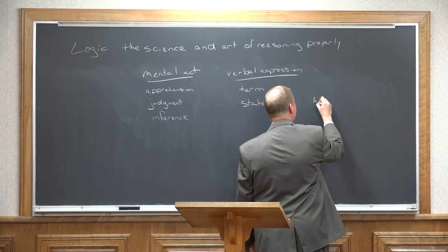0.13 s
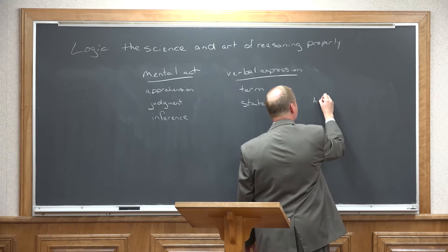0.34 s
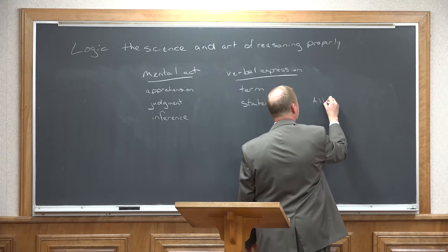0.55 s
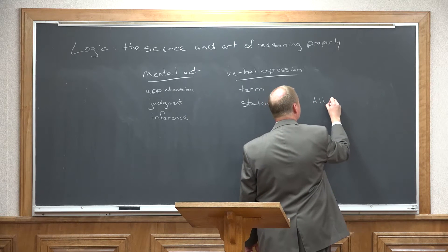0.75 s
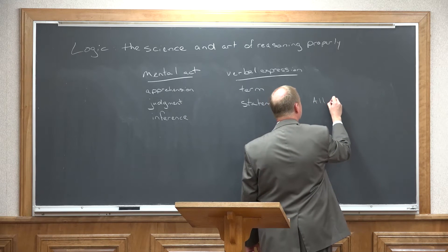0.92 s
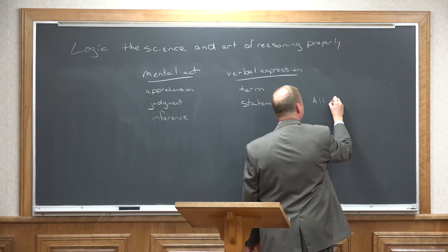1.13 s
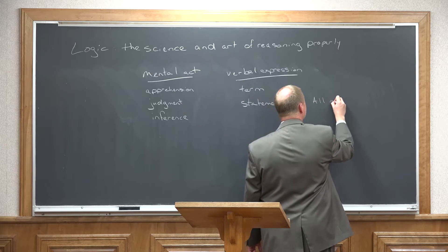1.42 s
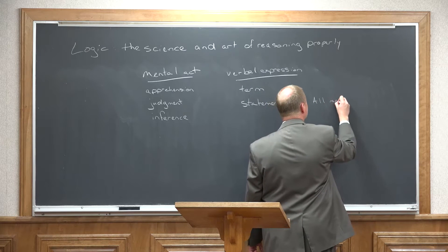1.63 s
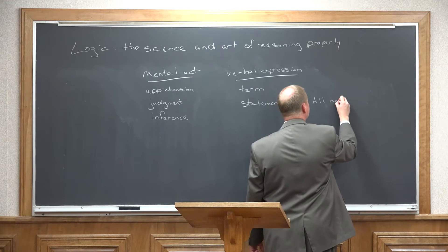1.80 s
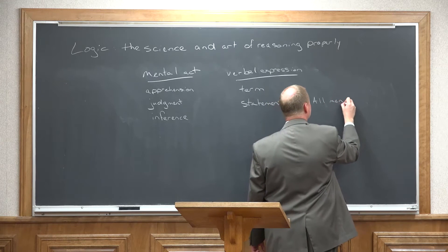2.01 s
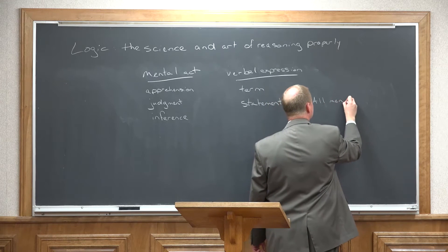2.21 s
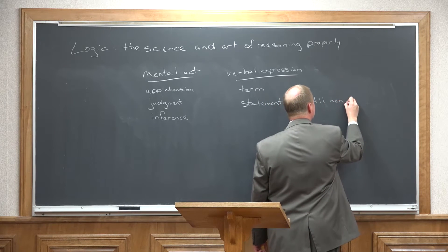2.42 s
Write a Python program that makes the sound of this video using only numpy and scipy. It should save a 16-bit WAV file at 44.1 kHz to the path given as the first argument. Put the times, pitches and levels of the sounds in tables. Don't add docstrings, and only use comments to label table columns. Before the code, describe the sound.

Close-up chalk strokes on a slate board in a hard-walled classroom; crisp and duller taps ring briefly, quiet dry drags fill between them, a soft knock comes midway, and steady room rumble and faint hiss continue underneath.

```python
import sys
import numpy as np
from scipy import signal
from scipy.fft import rfft, irfft
from scipy.io import wavfile
from scipy.ndimage import uniform_filter1d

SR = 44100
rng = np.random.default_rng(int(sys.argv[2]) if len(sys.argv) > 2 else 0)


def level_to_linear(level):
    exponent = np.asarray(level, float) / 20
    return 10 ** exponent


def store_pcm(level_fs):
    pcm = np.round(np.clip(level_fs, -1, 1) * 32767).astype(np.int16)
    wavfile.write(sys.argv[1], SR, np.atleast_2d(pcm).T)


N = 112454
LEAD = SR // 2

# (frequency [Hz], density [dB/Hz])
AIR_SPECTRUM = [(20, 5), (45, 5), (120, -9), (400, -18), (1500, -21), (3000, -27), (8000, -31.5),
                (16000, -35.5)]
AIR_DB, AIR_FLICKER_DB, AIR_FLICKER_HZ = -50, .7, 6.45

# (time [s], peak [dB], contact [ms], frame ring [dB], room [dB])
LANDINGS = [
    (-.2, -4, 0.095, 0, 4),
    (0.1071, -9, 0.095, -4, 2.5),
    (.3689, -5, 0.04, -6, 3),
    (0.7357, -9, 0.061, -3.5, 3),
    (1.3421, -7, 0.082, -4.5, 3),
    (1.6999, -7.5, 0.034, -3.5, 3),
    (2.1456, -6.5, 0.088, -7, 3.5),
]
# (frequency [Hz], level [dB], T60 [s])
BOARD_MODES = [(584, 3, 0.011), (1030, -.5, 0.0069), (1690, -8, .007), (3720, -0.5, 0.0054),
               (7600, -16, 0.0012)]
# (frequency [Hz], level [dB], T60 [s])
PANEL_MODES = [(67.2, -32, 0.74), (88, -27.5, 0.25), (122.2, -35.5, 0.36), (216.4, -30.5, 0.6),
               (306.2, -25.5, 0.21)]
# (frequency [Hz], level [dB], T60 [s])
FRAME_MODES = [(720, -22, 0.056), (1190, -21, 0.11), (1519, -11.5, 0.059), (1820, -10.5, 0.041),
               (2147, -23.5, 0.055), (3294, -6, 0.016), (4130, -10.5, 0.013)]
# (delay [s], level [dB])
NEAR_ECHOES = [(.0026, -13), (.0087, -20)]
# (frequency [Hz], level [dB], T60 [s])
NEAR_SCATTER = [(250, -40, 0.043), (595, -12.5, 0.07), (1200, -6.5, 0.072), (1900, -11, 0.096),
                (2800, -13, 0.057), (3960, -1, 0.028), (9300, -34, .05), (15000, -36, .04)]
# (frequency [Hz], level [dB], T60 [s])
TIP_CRUNCH = [(2500, -18, 0.047), (4000, -43, 0.023), (6440, -27.5, 0.032), (10000, -33.5, 0.035),
              (15000, -55, 0.036)]
# (frequency [Hz], level [dB], T60 [s])
ROOM_TAIL = [(41, -40.5, 1.6), (148, -31, 0.87), (540, -29.5, 0.88), (1390, -31, 0.96), (2430, -33, 0.54),
             (4860, -59, 1.9), (8000, -43, 0.67), (15000, -62, .4)]
# (frequency [Hz], level [dB], T60 [s])
ROOM_BLOOM = [(710, -54, 0.23), (1310, -32, 0.86), (1920, -37, 0.92), (2500, -40, 0.8), (3300, -33, 0.79),
              (5000, -37, 0.62), (8000, -43, 0.44), (14000, -60, .2)]
DETUNE, SCATTER_DB, LANDING_SCATTER = 0.0264, 1, .3
CONTACT_RISE_S, FRAME_RISE_S, FRAME_DELAY_S = .000022, .0008, 0.002538
PANEL_DELAY_S, THUMP_HZ, THUMP_DB, THUMP_T60_S = 0.00556, 179, -13.5, 0.01
NEAR_RISE_S, ROOM_RISE_S, ECHO_SMEAR_S = .004, .01, .0006
CRUNCH_RISE_S, CRUNCH_DB_PER_MS, CRUNCH_REF_MS = .001, -91, 0.117

# (start [s], end [s], start level [dB], end level [dB])
DRAGS = [(0.114, .24, -60, -65), (0.377, 0.498, -57, -59), (0.74, 1.16, -66, -68),
         (1.158, 1.247, -61, -60.5), (1.345, 1.418, -59, -59), (1.42, 1.592, -64, -56.5),
         (1.595, 1.697, -65, -67.5), (1.7, 1.874, -60, -62.5), (1.867, 2.003, -57.5, -60.5),
         (1.998, 2.16, -69.5, -62.5), (2.134, 2.405, -60, -59), (2.395, 2.48, -64, -66),
         (2.463, 2.606, -65.5, -51)]
# (frequency [Hz], density [dB/Hz])
GRIT_SPECTRUM = [(800, -6), (2800, -7), (3980, -2), (4130, 5), (4280, -2), (5800, -3.5), (8200, 0),
                 (15500, -8)]
# (frequency [Hz], density [dB/Hz])
RUMBLE_SPECTRUM = [(20, 5), (55, 9.5), (130, -1), (250, -13), (500, -34)]
RUMBLE_DB, GRIT_SPREAD_DB, GRIT_FLICKER_DB, GRIT_FLICKER_HZ = 10.5, 1.9, 1.4, 40
DRAG_RISE_S, DRAG_FALL_S, DRAG_ROOM_DB, DRAG_T60_S = .015, .008, -7, .3

# (time [s], peak [dB], contact [ms])
SOFT_KNOCKS = [
    (1.224, -26, 0.85),
    (1.575, -46, .3),
    (0.56, -37, 0.15),
]
# (time [s], peak [dB], pitch [Hz])
SNAPS = [
    (2.4495, -47, 11400),
    (1.891, -52, 6500),
    (1.102, -54, 7000),
]
SNAP_S = .003

BASS_CUT_HZ, TOP_HZ = 19, 15850


def table(rows, hz, order=1):
    rows = np.array(rows, float)
    return np.interp(np.log(np.maximum(hz, 1)), np.log(rows[:, 0]), rows[:, order])


def colour(x, rows):
    gain = level_to_linear(table(rows, np.fft.rfftfreq(len(x), 1 / SR)))
    y = irfft(rfft(x) * gain, len(x))
    return y / np.std(y)


def walk(rate_hz, size):
    hold = int(SR / rate_hz)
    w = np.repeat(rng.standard_normal(size // hold + 1), hold)
    w = uniform_filter1d(uniform_filter1d(w, hold), hold)[:size]
    return w / np.std(w)


def air():
    level = level_to_linear(AIR_DB + AIR_FLICKER_DB * walk(AIR_FLICKER_HZ, N))
    return level * colour(rng.standard_normal(N), AIR_SPECTRUM)


def rise(x, rise_s):
    return x * (1 - np.exp(-np.arange(len(x)) / SR / rise_s))


def rings(modes, chance, wave=np.sin):
    longest_s = max(t60 for _, _, t60 in modes)
    t = np.arange(int(SR * min(max(longest_s, .05), .8))) / SR
    out = np.zeros(len(t))
    for (hz, db, t60), (db_shift, hz_shift) in zip(modes, chance):
        level = level_to_linear(db + SCATTER_DB * db_shift)
        tone = wave(2 * np.pi * hz * (1 + DETUNE * hz_shift) * t)
        out += level * tone * np.exp(-np.log(1000) * t / t60)
    return out


def tail(rows, rise_s, size):
    t, hz = np.arange(size) / SR, np.fft.rfftfreq(size, 1 / SR)
    noise = rfft(rng.standard_normal(size))
    out = np.zeros(size)
    for mid_hz in 30 * 2 ** np.arange(0, 9.5, .5):
        octaves = np.log2(hz / mid_hz + 1e-9)
        band = np.cos(np.pi * np.clip(octaves, -.5, .5)) ** 2
        level = np.sqrt(SR / mid_hz / 4) * level_to_linear(table(rows, mid_hz))
        decay = 1000. ** (-t / table(rows, mid_hz, order=2))
        out += irfft(noise * band, size) * level * decay
    return out * (1 - np.exp(-(t / rise_s) ** 2))


def push(contact_ms):
    t = np.arange(256) / SR / (contact_ms / 1000 / 2)
    force = t * np.exp(-t)
    return force / force.sum()


def near_echo(first, db):
    smear = rng.standard_normal(128) * np.exp(-np.arange(128) / SR / ECHO_SMEAR_S)
    return level_to_linear(db) * np.convolve(np.diff(first[:2048]) * 4, smear / np.linalg.norm(smear))


def blow(contact_ms, ring_db, room):
    chance = rng.standard_normal((3, 14, 2))
    first = -rise(rings(BOARD_MODES, chance[0] * LANDING_SCATTER, np.cos) / 2, CONTACT_RISE_S)
    panel = rings(PANEL_MODES + [(THUMP_HZ, THUMP_DB, THUMP_T60_S)], chance[1] / 2)
    frame = level_to_linear(ring_db) * rise(rings(FRAME_MODES, chance[2]), FRAME_RISE_S)
    near = level_to_linear(ring_db) * tail(NEAR_SCATTER, NEAR_RISE_S, SR // 4)
    parts = [(0, first), (PANEL_DELAY_S, panel), (FRAME_DELAY_S, frame), (0, near)]
    parts += [(delay_s, near_echo(first, db)) for delay_s, db in NEAR_ECHOES]
    response = room.copy()
    for delay_s, x in parts:
        i = int(delay_s * SR)
        response[i:i + len(x)] += x
    y = signal.fftconvolve(response, push(contact_ms))[:SR]
    crunch_db = CRUNCH_DB_PER_MS * (contact_ms - CRUNCH_REF_MS)
    y[:SR // 4] += level_to_linear(crunch_db) * tail(TIP_CRUNCH, CRUNCH_RISE_S, SR // 4)
    return y


def room_at(rooms, s):
    return np.cos(s) * rooms[0] + np.sin(s) * rooms[1]


def add(out, x, s):
    at = s * SR + LEAD
    i = int(at)
    shift = np.sinc(np.arange(-4, 5) - (at - i)) * np.hanning(11)[1:-1]
    x = np.convolve(x, shift)[4:len(out) - i + 4]
    out[i:i + len(x)] += x


def landings(rooms):
    out = np.zeros(N + LEAD)
    for s, db, contact_ms, ring_db, room_db in LANDINGS:
        add(out, level_to_linear(db) * blow(contact_ms, ring_db, level_to_linear(room_db) * room_at(rooms, s)), s)
    return out[LEAD:]


def drags():
    t, gate = np.arange(N) / SR, np.zeros(N)
    for start_s, end_s, first_db, last_db in DRAGS:
        edge = np.clip(np.minimum((t - start_s) / DRAG_RISE_S, (end_s - t) / DRAG_FALL_S), 0, 1)
        gate += edge * level_to_linear(np.interp(t, (start_s, end_s), (first_db, last_db)))
    grains = rng.standard_normal(N) * level_to_linear(GRIT_SPREAD_DB * rng.exponential(size=N))
    flicker = level_to_linear(GRIT_FLICKER_DB * walk(GRIT_FLICKER_HZ, N))
    grit = colour(grains, GRIT_SPECTRUM) * gate * flicker
    rumble = level_to_linear(RUMBLE_DB) * colour(rng.standard_normal(N), RUMBLE_SPECTRUM)
    direct = grit + rumble * uniform_filter1d(gate, size=1000)
    t = np.arange(SR // 2) / SR
    room = rng.standard_normal(len(t)) * 1000. ** (-t / DRAG_T60_S)
    return direct + level_to_linear(DRAG_ROOM_DB) * signal.fftconvolve(direct, room / np.linalg.norm(room))[:N]


def knocks(rooms):
    out = np.zeros(N + LEAD)
    for s, db, contact_ms in SOFT_KNOCKS:
        add(out, level_to_linear(db) * blow(contact_ms, 0, room_at(rooms, s)), s)
    return out[LEAD:]


def crumbs():
    out, t = np.zeros(N + LEAD), np.arange(int(SNAP_S * SR)) / SR
    swell = np.sin(np.pi * t / t[-1]) ** 2
    for s, db, hz in SNAPS:
        add(out, level_to_linear(db) * np.sin(2 * np.pi * hz * t) * swell * rng.uniform(0, 1, len(t)), s)
    return out[LEAD:]


def scene():
    rooms = [tail(ROOM_TAIL, ROOM_RISE_S, SR) + tail(ROOM_BLOOM, ROOM_RISE_S, SR) for _ in range(2)]
    return (air() + landings(rooms) + drags() + knocks(rooms) + crumbs())[None]


def band_limit(x):
    return signal.sosfilt(signal.butter(12, 16810, fs=SR, output="sos"), x)


def record(dry):
    bass_cut = signal.butter(1, BASS_CUT_HZ, "high", fs=SR, output="sos")
    top_cut = signal.ellip(10, .2, 45, TOP_HZ, fs=SR, output="sos")
    mix = signal.sosfilt(np.vstack([bass_cut, top_cut]), dry)
    return band_limit(mix)


dry = scene()
out = record(dry)
store_pcm(out)
```